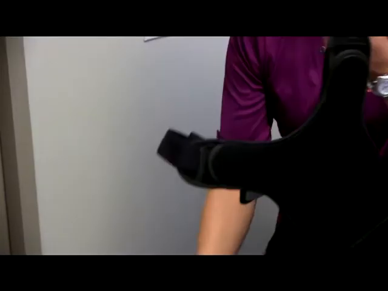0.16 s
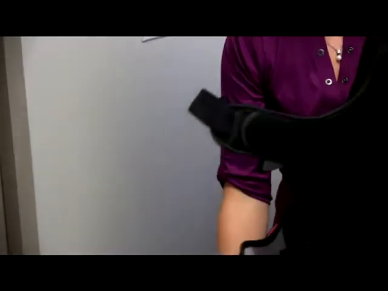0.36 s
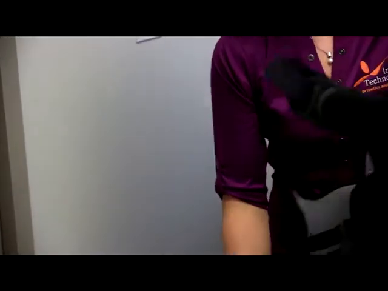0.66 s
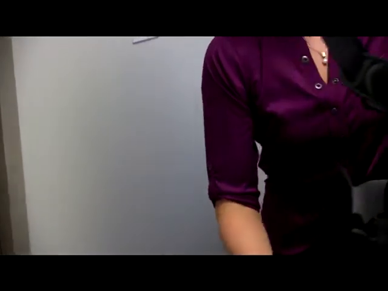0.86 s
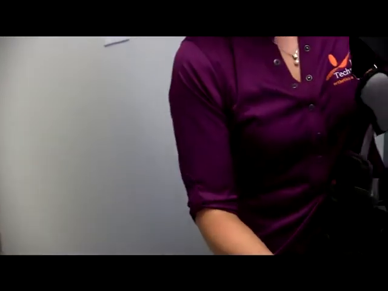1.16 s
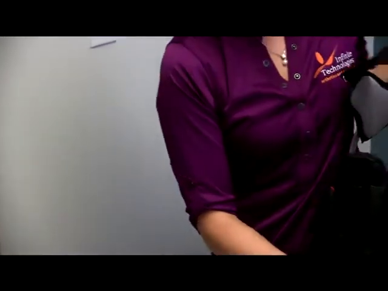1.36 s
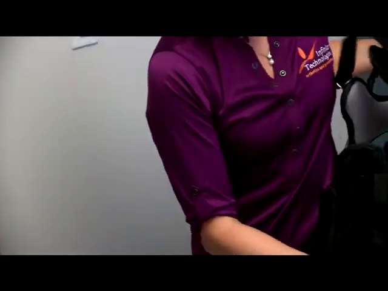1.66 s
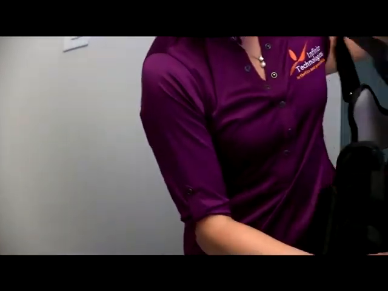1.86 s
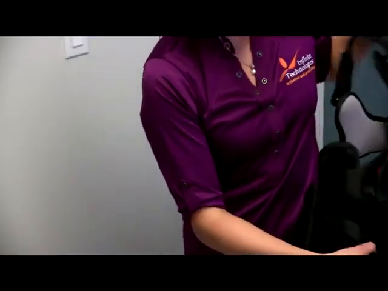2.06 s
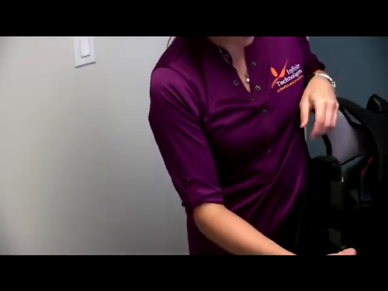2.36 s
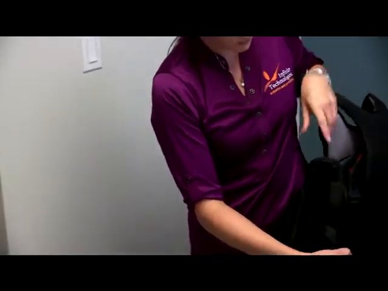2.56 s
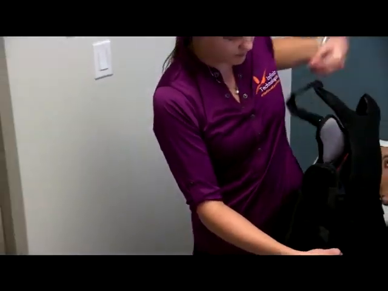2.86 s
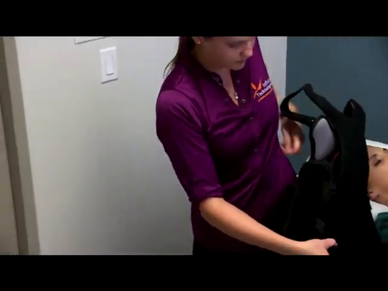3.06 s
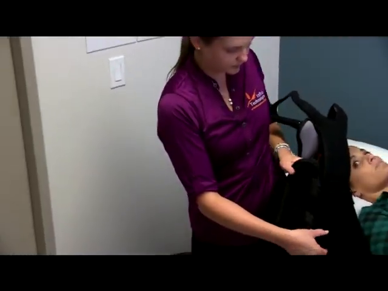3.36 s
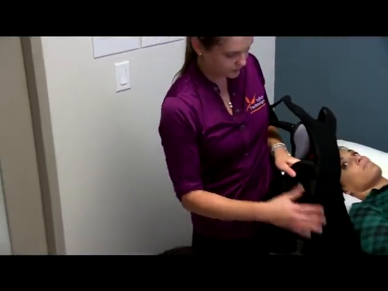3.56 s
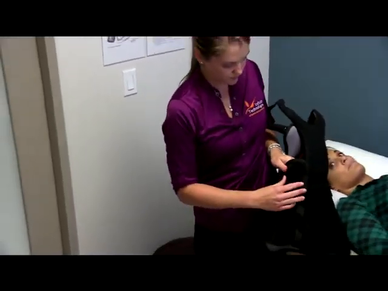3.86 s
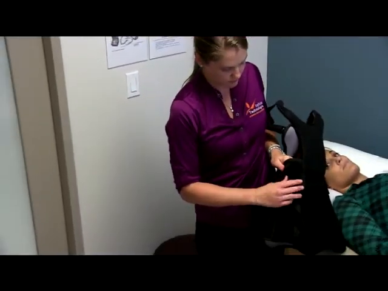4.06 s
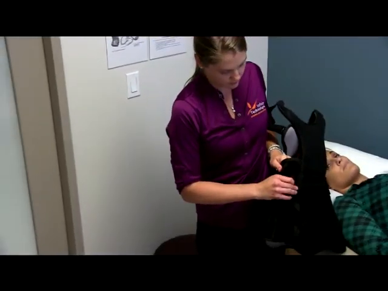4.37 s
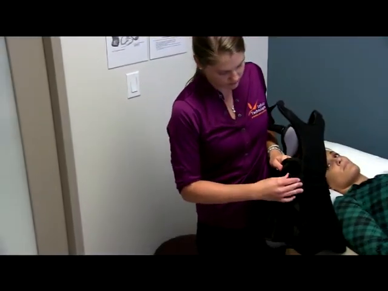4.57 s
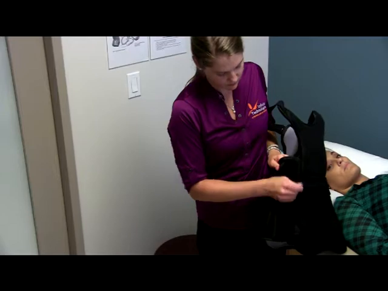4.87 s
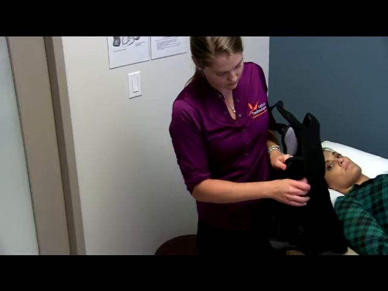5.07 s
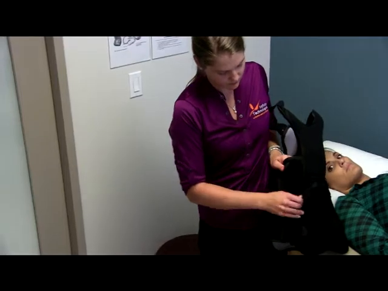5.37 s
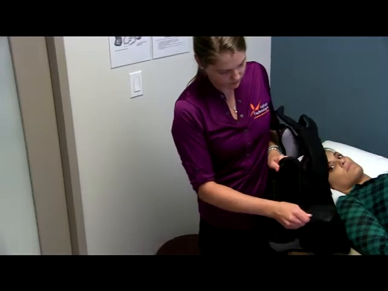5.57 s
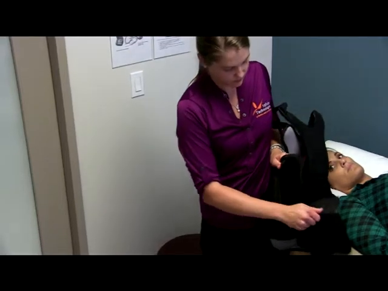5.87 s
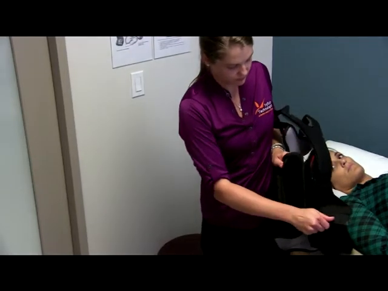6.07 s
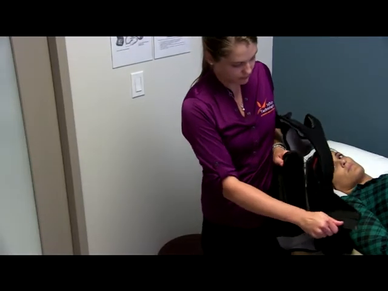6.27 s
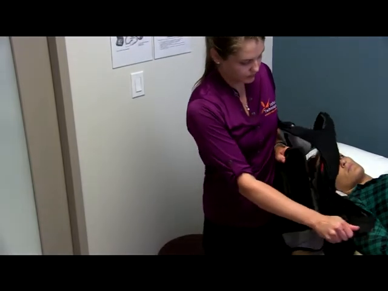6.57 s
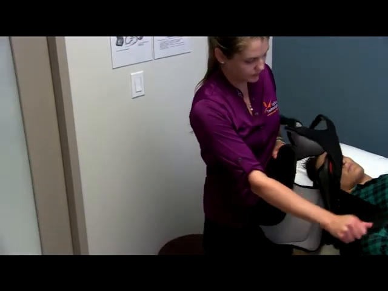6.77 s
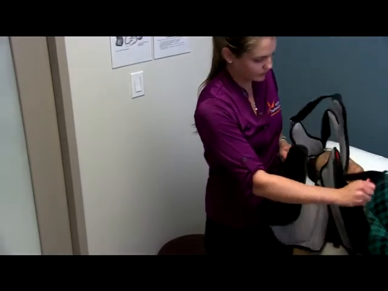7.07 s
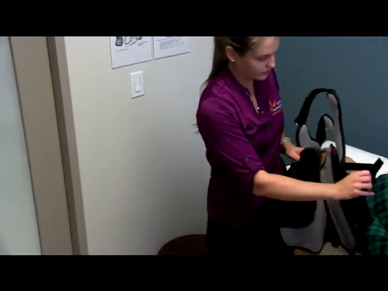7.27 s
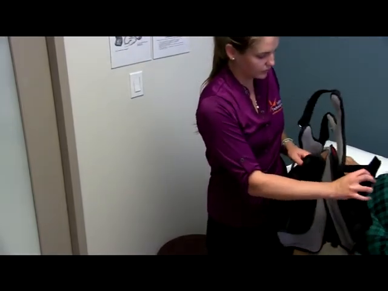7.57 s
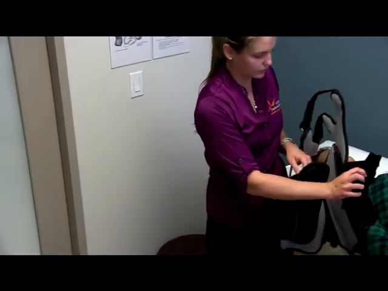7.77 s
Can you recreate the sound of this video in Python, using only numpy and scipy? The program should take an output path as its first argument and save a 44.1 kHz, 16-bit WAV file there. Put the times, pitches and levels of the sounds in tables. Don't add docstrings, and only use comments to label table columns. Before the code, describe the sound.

In a small room, low ventilation rumbles steadily. Two soft bumps come through the floor, then faint cloth rustles and small ticks as a padded brace is handled. After about four seconds hook-and-loop straps are ripped open in quick rasping pulls, the last one long and jerky, before it settles back to light rustling. The close sound is dull, with weak, patchy treble.

```python
import sys
import numpy as np
from scipy import signal
from scipy.fft import rfft, irfft, next_fast_len
from scipy.io import wavfile
from scipy.ndimage import uniform_filter1d, minimum_filter1d

SR = 44100
rng = np.random.default_rng(int(sys.argv[2]) if len(sys.argv) > 2 else 0)


def generate_wav(signal):
    frames = np.transpose(np.atleast_2d(signal))
    scaled = np.clip(frames, -1, 1) * 32767
    pcm = np.round(scaled).astype(np.int16)
    wavfile.write(sys.argv[1], SR, pcm)


def invert_db(x):
    u = np.asarray(x, float) / 20
    return 10 ** u


N = 348831
TIME_S = np.arange(N) / SR
BRACE_OPENS_S, BRACE_OPENING_S = 5.03, 0.86


def evened(x):
    return x / np.sqrt(np.mean(x ** 2) + 1e-30)


def colour(x, points):
    point_hz, point_db = np.transpose(points)
    size = next_fast_len(N + 8192)
    wide = np.pad(x, (4096, size - N - 4096), "reflect")
    hz = np.fft.rfftfreq(size, 1 / SR)
    gain_db = np.interp(np.log(hz + 1), np.log(point_hz + 1), point_db)
    return irfft(rfft(wide) * invert_db(gain_db), size)[4096:][:N]


def drift(rate_hz):
    knots_per_s = 400
    knots = rng.standard_normal(int(N / SR * knots_per_s))
    smooth = signal.lfilter([1], [1, -np.exp(-2 * np.pi * rate_hz / knots_per_s)], knots)
    return np.interp(np.arange(N), np.linspace(0, N, len(smooth)), evened(smooth))


def ring(x, hz, width_hz):
    pole = np.exp((2j * np.pi * hz - np.pi * width_hz) / SR)
    once = signal.lfilter([1 - abs(pole)], [1, -pole], x)
    return 2 * signal.lfilter([1 - abs(pole)], [1, -pole], once).real


def body(x, modes, tilt_db=0):
    uneven, wander_db = 0.74, 1.44
    out = np.zeros(N)
    for k, (hz, width_hz, db) in enumerate(modes):
        struck = x * (1 + uneven * rng.standard_normal(N)) / np.sqrt(1 + uneven ** 2)
        level_db = db + tilt_db * np.log2(hz / 2500) + wander_db * drift(2.6)
        out += (-1) ** k * invert_db(level_db) * ring(struck, hz, width_hz)
    return out


# start in seconds, let-go in seconds, pull in dB, shell share in dB, hook fizz share in
# dB.
TUGS = [(4.13, 4.168, -45, 0, -23.5), (4.179, 4.19, -30.5, -3, -28.5), (4.195, 4.25, -33, -12, -25.5),
        (4.27, 4.313, -31.5, -1, -19), (4.369, 4.411, -30, 1, -17), (4.41, 4.482, -27.5, -13.5, -21.5),
        (4.732, 4.794, -42, -6, -19), (4.786, 4.854, -34.5, 2, -16.5), (4.851, 4.925, -23, -6, -18),
        (4.895, 4.997, -20, -7.5, -24), (5.147, 5.176, -39, -15, -25), (5.228, 5.284, -44, -2.5, -27),
        (5.309, 5.33, -32.5, 5.5, -21.5), (5.339, 5.433, -23, -4, -20.5), (5.425, 5.501, -19.5, -2, -25.5),
        (5.5, 5.561, -22.5, -2, -23.5), (5.58, 5.643, -38, -3, -18.5), (5.65, 5.705, -38, -4, -21),
        (5.726, 5.759, -35, -6, -26), (5.781, 5.812, -27.5, -8, -28), (5.834, 5.87, -28.5, -5.5, -23.5),
         (5.879, 5.975, -23, -3.5, -21), (6.01, 6.13, -27, 0.5, -19), (6.13, 6.198, -26.5, -3, -19.5),
         (6.179, 6.24, -23.5, -3, -23.5), (6.24, 6.271, -28.5, -9.5, -22), (6.316, 6.351, -28.5, 0.5, -20),
         (6.347, 6.431, -31, 1.5, -18.5), (6.431, 6.536, -25, -0.5, -18.5), (6.515, 6.639, -27, -3.5, -21),
         (6.688, 6.776, -27, -3.5, -20.5), (6.884, 6.973, -38.5, -7, -25.5), (7.848, 7.858, -31, -9, -28)]
RUSTLES = [(.6, .72, -51.5, -1.5, -23), (1.1, 1.202, -56.5, 1.5, -28.5), (1.3, 1.4, -52, 2, -27),
           (1.45, 1.58, -44.5, -2, -25.5), (1.614, 1.7, -53, -0.5, -20), (1.795, 1.884, -45.5, -1.5, -22),
           (1.926, 1.978, -39, -5, -25.5), (2.06, 2.09, -44, 2.5, -23), (2.15, 2.19, -48, -14.5, -24),
           (2.26, 2.342, -43.5, 3, -29), (2.45, 2.525, -51.5, -8, -26), (2.648, 2.732, -52, 1.5, -20.5),
           (2.86, 2.906, -46.5, -2, -25), (2.958, 2.974, -45.5, -7, -27), (3.41, 3.506, -49.5, -4, -23),
           (3.548, 3.696, -60, -3, -20.5), (3.885, 3.91, -54.5, 5.5, -25), (7.035, 7.12, -50, 1, -30),
           (7.17, 7.223, -44, -12, -24), (7.239, 7.273, -38, -18, -22), (7.4, 7.497, -50.5, -8, -25),
           (7.563, 7.587, -44, -33, -20), (7.776, 7.83, -50, -6, -20), (7.833, 7.855, -44, -9, -24)]


def handling():
    tug_let_go_db_s, rustle_let_go_db_s = 253, 153.5
    creep_db, creep_shell_db, creep_fizz_db = -58.5, -1.5, -20.5
    pad_share_db, pad_opening_db = -14.5, 6.5
    t = np.arange(0, N / SR + .002, .001)
    rows = [(*r, tug_let_go_db_s) for r in TUGS]
    rows += [(*r, rustle_let_go_db_s) for r in RUSTLES]
    start, end, db, shell_db, fizz_db, fall_db_s = np.transpose(rows)[:, :, None]
    swell = np.sin(np.pi / 2 * np.clip((t - start) / (end - start), 0, 1))
    fade_db = -fall_db_s * np.maximum(t - end, 0)

    pad_db = pad_share_db + 0.34 * shell_db + 0.11 * (db + 29.5)
    opened = np.clip((start - BRACE_OPENS_S) / BRACE_OPENING_S, 0, 1)
    pad_db = pad_db + pad_opening_db * opened * (db > -38)

    parts = [swell ** 0.62 * invert_db(db + fade_db),
             swell * invert_db(db + shell_db + fade_db),
             swell ** 0.7 * invert_db(db + fizz_db + 0.8 * fade_db),
             swell * invert_db(db + pad_db + fade_db)]
    still_db = creep_db + np.array([0, creep_shell_db, creep_fizz_db, pad_share_db])
    drives = [np.sqrt((p ** 2).sum(0) + invert_db(s) ** 2) for p, s in zip(parts, still_db)]

    shell_over_strap_db = 20 * np.log10(drives[1] / drives[0])
    strap_db = 20 * np.log10(drives[0])
    tilt_db = np.clip(2 - 0.4 * shell_over_strap_db - 0.071 * (strap_db + 35), -12, 13)
    return [np.interp(TIME_S, t, d) for d in drives + [tilt_db]]


def hook_snaps():
    snaps_per_s, spread_db, clump_db = 3200, 2, 0.3
    slips_per_s, slip_ms, slip_size = 110, 4.7, 0.23
    size = invert_db(spread_db * np.minimum(rng.exponential(1, N), 5) + clump_db * drift(35.0))
    slips = np.minimum(rng.exponential(1, N), 3) * (rng.random(N) < slips_per_s / SR)
    slipping = signal.lfilter([1], [1, -np.exp(-1000 / SR / slip_ms)], slips)
    size = size * (1 + slip_size * slipping)
    return evened(size * rng.choice([-1., 1.], N) * (rng.random(N) < snaps_per_s / SR))


# time in seconds, strap level in dB, fizz share in dB, scrape length in ms.
TICKS = [(0.679, -44, -12, 3), (1.9462, -26, -40, 4.3), (2.0614, -37, -11, 2.7), (2.068, -41.5, -5, 3),
         (2.274, -32, -19, 3), (2.3125, -25, -44, 2.8), (2.881, -35, -27, 3), (2.8945, -35, -20, 3),
         (2.9683, -28, -25.5, 3), (4.1305, -35, -20, 2.6), (4.149, -32, -18, 3), (4.188, -28, -18, 3.7),
         (4.2373, -25.5, -23, 3.7), (4.25, -17.5, -30, 3), (4.2903, -33, -18, 3),
         (4.379, -21.5, -23.5, 2.3), (4.743, -25, -22, 3), (4.7794, -34.5, -10, 2.1),
         (4.806, -19, -23.5, 3), (5.3159, -27, -15.5, 3.6), (5.7464, -24, -31, 3.3), (5.9, -10, -34, 3.5),
         (6.339, -21, -31, 3), (7.1928, -24, -34, 2.7), (7.252, -18, -28, 5.8), (7.5826, -24.5, -22, 6),
         (7.8563, -32, -37, 5.3)]


def ticks():
    hard, bright = np.zeros((2, N))
    for s, db, share_db, ms in TICKS:
        burst = rng.standard_normal(1500) * np.exp(-np.arange(1500) / SR * 1000 / max(ms, .3))
        hard[round(s * SR):][:1500] += invert_db(db - 10.5) * burst
        bright[round(s * SR):][:1500] += invert_db(db + share_db - 6.5) * burst
    return hard, bright


# frequency in Hz, width in Hz, level in dB.
STRAP = [(1730, 280, -6.5), (1990, 560, -10), (2188, 920, -1.5), (2583, 370, -1), (2855, 390, -4),
         (3132, 270, 1), (3537, 1000, -2.5)]
SHELL = [(723, 43, -12.5), (938, 280, -1), (1091, 140, 5.5), (1197, 280, 0.5), (1472, 340, -7)]
PADDING = [(270, 220, 1.5), (455, 100, -1.5), (610, 240, 3)]
# frequency in Hz, density in dB per Hz.
FIZZ = [(6000, 5), (9000, 4.5), (11500, -6), (12400, -5.5), (13500, -7.5), (16000, -20)]
TICK_FIZZ = [(4500, -82), (6000, -8), (9500, 3.5), (11500, -7), (12500, 0.5), (14600, -10), (15200, -20)]


def straps():
    pull, shell, fizz, padding, tilt_db = handling()
    shut = np.clip(1 - (TIME_S - BRACE_OPENS_S) / BRACE_OPENING_S, 0, 1)
    shell_tilt_db, pad_tilt_db = 10.5 * shut ** 6, 8.5 * shut
    shell = shell * invert_db(1.1 * shell_tilt_db)
    padding = padding * invert_db(2.07 * pad_tilt_db)

    snaps = hook_snaps()
    hard, bright = ticks()
    strap_ring = invert_db(11.5) * body(pull * snaps + hard, STRAP, tilt_db)
    shell_ring = invert_db(10.5) * body(shell * snaps + 0.22 * hard, SHELL, shell_tilt_db)
    pad_ring = invert_db(14.0) * body(padding * snaps, PADDING, pad_tilt_db)

    hiss = [(4500, -80), *FIZZ]
    loss = np.std(recorder_tone(colour(snaps, hiss)))
    hissing = invert_db(-1.5) * (colour(fizz * snaps, hiss) + colour(bright, TICK_FIZZ)) / loss
    return strap_ring + shell_ring + pad_ring + hissing


def slide():
    centre_s, half_s, hz, width_hz, level_db = 7.84, .04, 14200, 700, -56
    swell = np.exp(-((TIME_S - centre_s) / half_s) ** 2)
    return invert_db(level_db) * swell * evened(ring(rng.standard_normal(N), hz, width_hz))


def room(x):
    t60_s, spacing = 0.45, 22
    taps = np.zeros(SR // 2)
    at = np.arange(200, len(taps) - spacing, spacing)
    taps[at + rng.integers(0, spacing, len(at))] = rng.choice([-1., 1.], len(at))
    t = np.arange(len(taps)) / SR
    low = signal.lfilter(*signal.butter(2, 6000, fs=SR), taps)
    tail = low * invert_db(-60 * t / t60_s) + (taps - low) * invert_db(-60 * t / (0.84 * t60_s))
    return signal.fftconvolve(x, tail / np.linalg.norm(tail))[:N]


# time in seconds, frequency in Hz, level in dB, t60 in seconds, rise in seconds,
# pitch drop as a fraction.
BUMPS = [
    (0.15, 61, -6.5, 0.19, 0.014, 0),
    (0.909, 17, -6.5, 0.79, 0.01, 0.96),
]


def bumps():
    out = np.zeros(N)
    for s, hz, db, t60_s, rise_s, drop in BUMPS:
        t = np.maximum(TIME_S - s, 0)
        turns = hz * (t + drop * 0.038 * (1 - np.exp(-t / 0.039)))
        out += invert_db(db - 60 * t / t60_s) * (1 - np.exp(-t / rise_s)) * np.sin(2 * np.pi * turns)
    return out


# frequency in Hz, density in dB per Hz.
AIR = [(2, -24), (11, 2.5), (18, -4), (26, -10), (50, -17), (130, -24), (170, -24.5), (260, -30),
       (500, -41), (1250, -45.5), (1700, -57.5), (2600, -52.5), (9000, -63.5), (16000, -60.5)]
# time in seconds, level in dB.
SURGE = [(0, -25.5), (.35, -20.5), (.85, -27), (1.05, -15), (1.5, -22), (1.7, -23.5), (2.1, -21),
         (2.8, -26), (4.0, -22), (4.4, -27.5), (4.8, -16), (5.5, -25), (6.6, -19.5), (7.4, -25.5),
         (7.91, -23)]
# frequency in Hz, width in Hz, level in dB.
DUCT = [(90.7, 9, -40.5), (119.4, 14, -37), (144.8, 5.8, -41), (216.85, 9.1, -42)]


def ventilation():
    tone = invert_db(-21.5) * evened(colour(rng.standard_normal(N), AIR))
    deep = colour(tone, [(40, 0), (60, -60)])
    surge_s, surge_db = np.transpose(SURGE)
    surge = invert_db(np.interp(TIME_S, surge_s, surge_db)) * evened(deep)
    hums = sum(invert_db(db) * evened(ring(rng.standard_normal(N), hz, width_hz)) for hz, width_hz, db in DUCT)
    return (tone - deep) * invert_db(0.44 * drift(3.0)) + surge + hums


# frequency in Hz, gain in dB.
EQUALISER = [(2900, 1.5), (3300, -11), (3800, -15), (4050, -23), (4200, -49), (4300, -110), (7500, -110),
             (7700, -50), (7900, -41), (8400, -33.5), (11880, -27.5), (11990, -13), (15560, -14.5),
             (15760, -96)]


def recorder_tone(x):
    return colour(x, EQUALISER)


def scene():
    near = straps() + slide()
    rips = near + invert_db(-5) * room(near)
    power = abs(uniform_filter1d(recorder_tone(rips) ** 2, 16000))
    loud_db = 10 * np.log10(power + 1e-12)
    duck_db = -.2 * np.maximum(loud_db + 32.5, 0)
    return (rips + ventilation() * invert_db(duck_db) + bumps())[None]


def roll_off(x):
    return signal.sosfilt(signal.butter(12, 15690, fs=SR, output="sos"), x)


def record(dry):
    limit = 0.5
    heard = recorder_tone(dry[0])
    ease = minimum_filter1d(np.minimum(limit / (abs(heard) + 1e-9), 1), size=441)
    heard = heard * uniform_filter1d(uniform_filter1d(ease, size=220), size=220)
    return roll_off(heard[None])


dry = scene()
out = record(dry)
generate_wav(out)
```